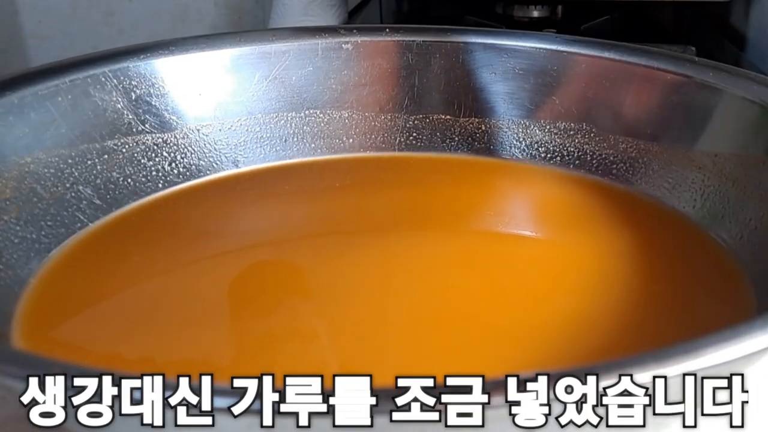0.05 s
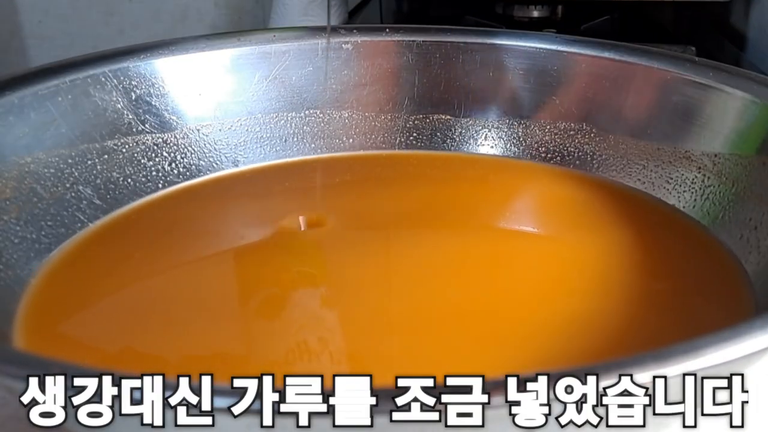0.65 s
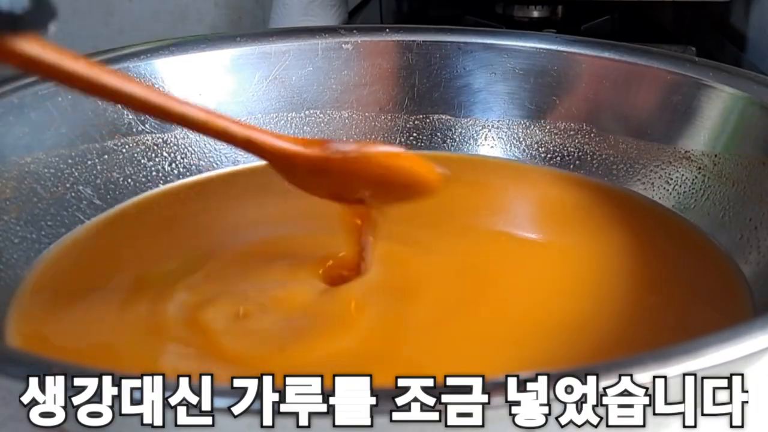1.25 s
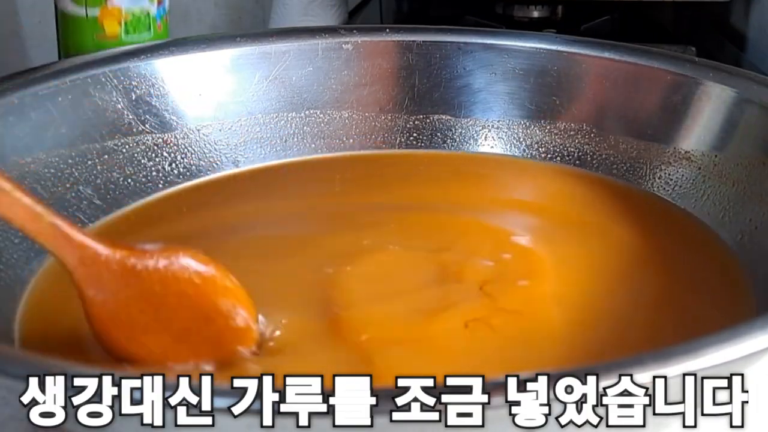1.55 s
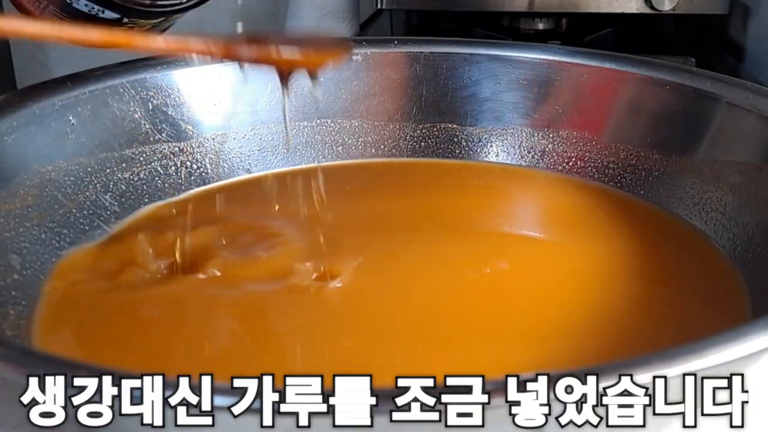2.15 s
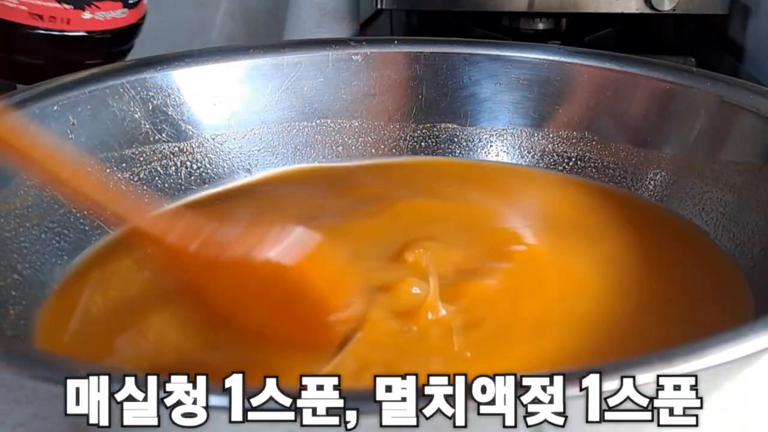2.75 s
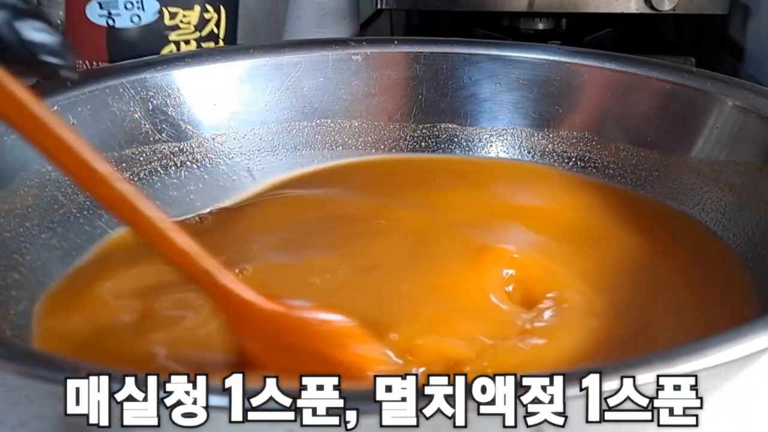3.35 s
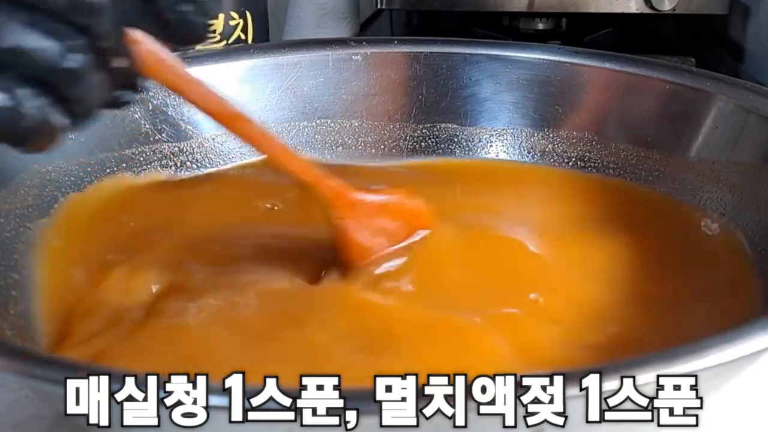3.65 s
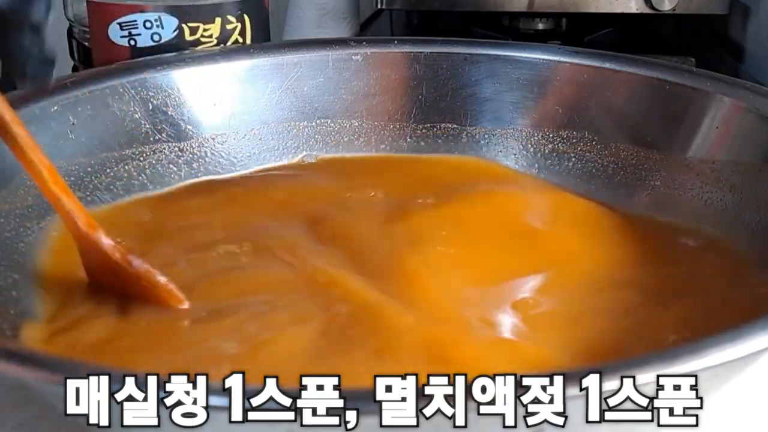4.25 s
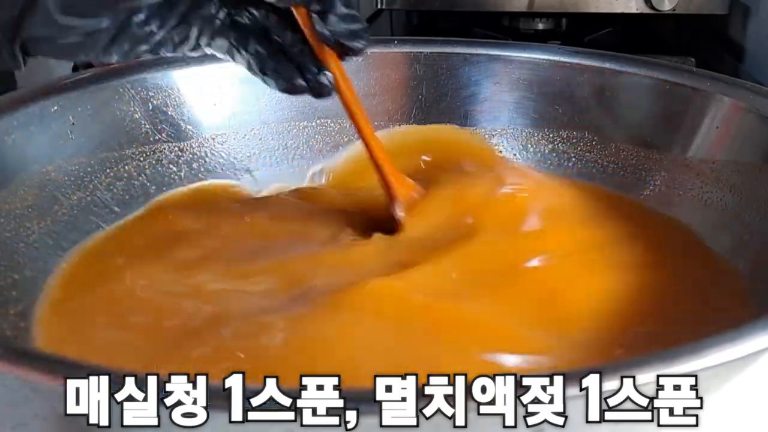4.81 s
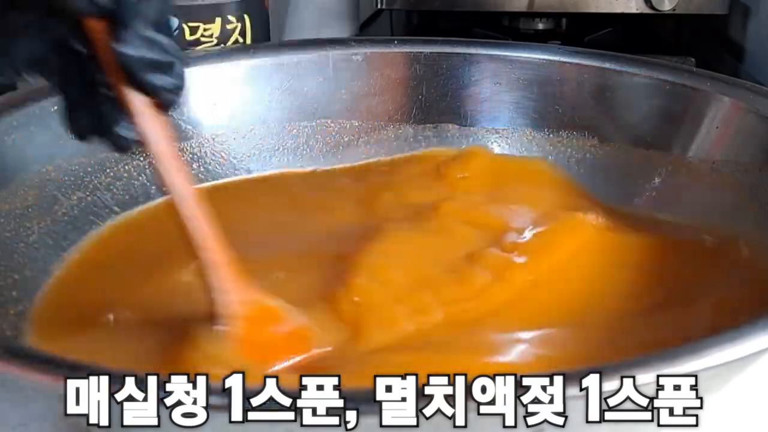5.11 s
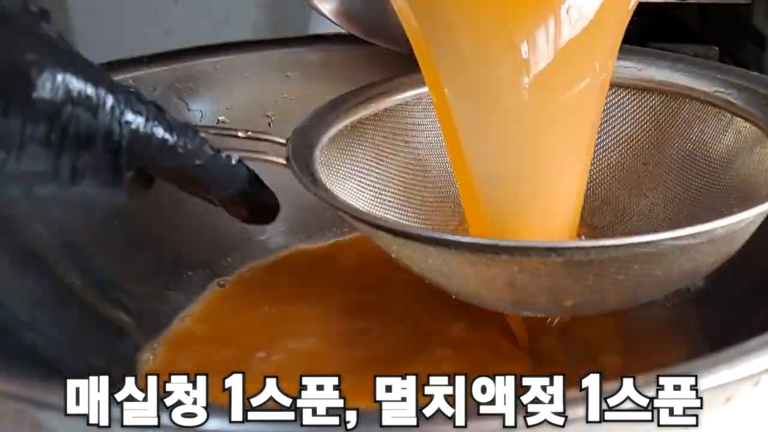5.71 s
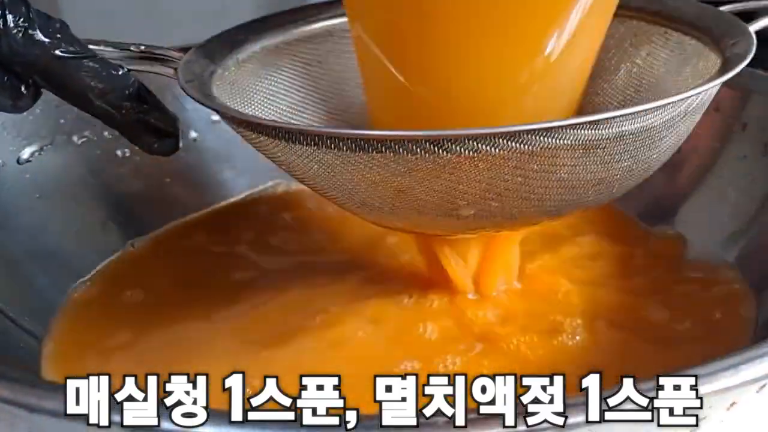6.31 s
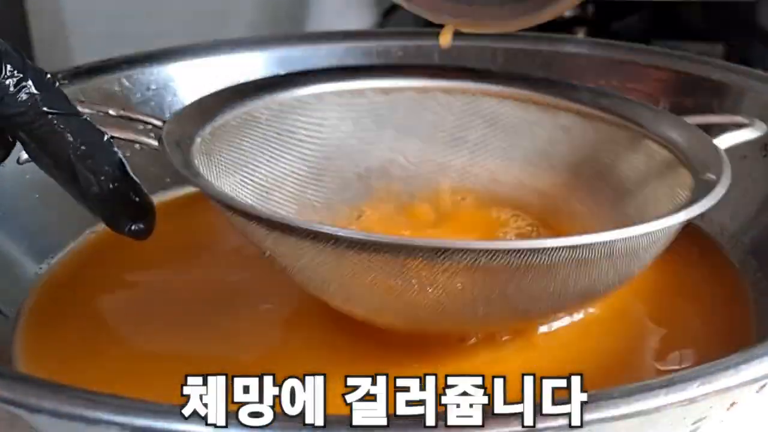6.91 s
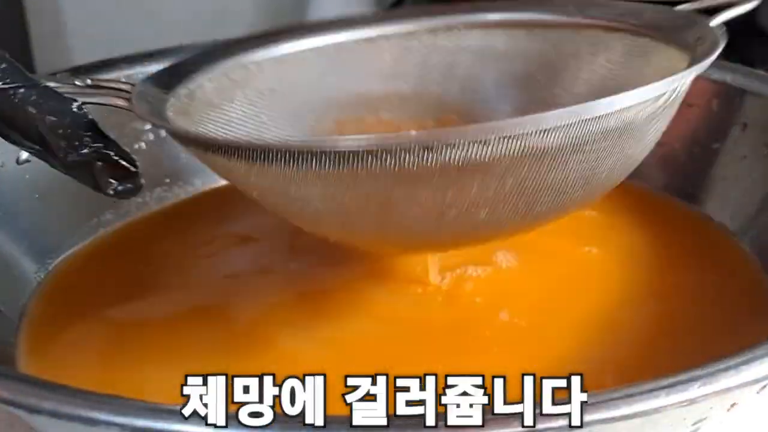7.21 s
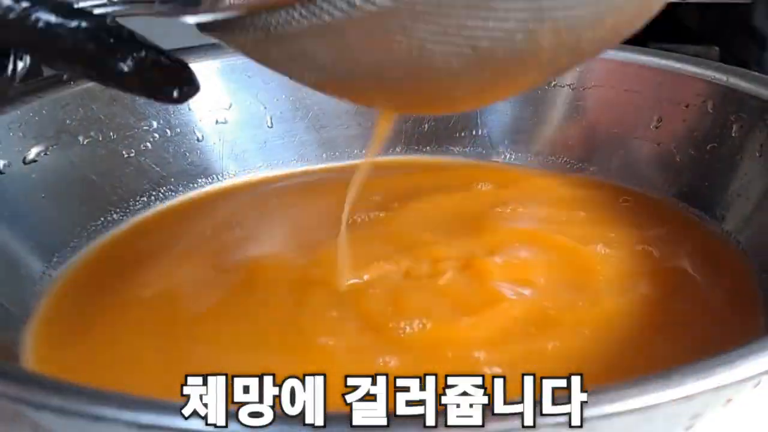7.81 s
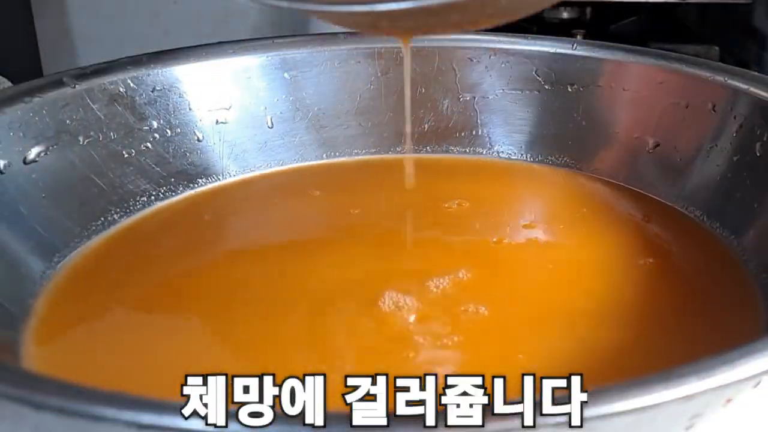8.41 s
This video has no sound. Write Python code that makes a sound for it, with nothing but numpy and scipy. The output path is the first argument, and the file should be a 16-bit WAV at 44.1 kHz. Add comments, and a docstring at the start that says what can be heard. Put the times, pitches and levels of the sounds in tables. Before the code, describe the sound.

Close, wet kitchen sounds over quiet room air. A few drops plink into sauce over a muffled engine hum that soon stops. Louder plops and splashes lead into gentle stirring, with deep gulps and several short, ringing knocks of a spoon on the steel bowl. After a brief dip, liquid hisses onto a strainer and splashes through into the bowl, ending in light trickles, scattered drips and a faint fizz of froth.

```python
"""Kitchen work over a wide steel bowl of thick sauce, in three shots joined by short fades.
First, seasonings drip from a spoon, each drop trapping a ringing bubble, while an engine drones outside.
Next, bigger splashes thump in the bowl; then the spoon stirs, the sauce gulps and the knocked steel rings.
Last, the sauce is poured through a mesh strainer: it hisses on the bare mesh, breaks through with a
gurgle and drains in a thinning dribble as the froth fizzes away."""
import sys
import numpy as np
from scipy import signal
from scipy.fft import rfft, irfft, next_fast_len
from scipy.io import wavfile
from scipy.ndimage import map_coordinates

SR = 44100
rng = np.random.default_rng(int(sys.argv[2]) if len(sys.argv) > 2 else 0)


def log_audio(samples):
    """Write samples as a 16-bit WAV file to the path given in sys.argv[1]."""
    # one column per channel
    frames = np.atleast_2d(samples).T
    # limit to full scale, then quantise
    limited = np.clip(frames, -1, 1)
    pcm = np.round(limited * 32767).astype(np.int16)
    wavfile.write(sys.argv[1], SR, pcm)


N = 373086
TIME = np.arange(N) / SR

# Cue sheets; levels are relative, ahead of the mix.
SHOT_CHANGES = [1.58, 5.29]  # where one shot gives way to the next: time_s
DRIPS = [(0.757, 3990, -45.5, 0.17), (0.838, 4370, -32.5, 0.048), (0.881, 6260, -26, 0.034),
         (0.913, 2520, -28.5, 0.19), (1.034, 2122, -27.5, 0.09), (1.039, 5040, -20, 0.016),
         (1.135, 1190, -11.5, .03), (1.142, 725, -25, 0.04), (2.06, 1712, -16, 0.063),
         (2.086, 990, -18.5, 0.17), (2.111, 987, -15, 0.1), (2.151, 4150, -13, .035),
         (2.208, 977.5, -16, 0.15), (2.224, 2107, -19, 0.15), (2.231, 3120, -21.5, 0.11),
         (2.297, 2034, -13, 0.045), (2.33, 5880, -14.5, 0.052), (2.364, 934, -21.5, 0.076),
         (2.468, 2050, -35, 0.06), (2.537, 1067, -7.5, 0.089), (2.993, 1950, -22.5, 0.13),
         (3.83, 3380, -30.5, .04), (5.377, 3220, -22, 0.042), (5.469, 3250, -14.5, 0.029),
         (5.529, 3060, -19, 0.033), (5.645, 5630, -26.5, 0.057), (5.718, 4670, -22, .02),
         (5.737, 1406, -9.5, 0.022), (5.942, 1005, -15, 0.053), (6.004, 1550, -14, 0.036),
         (6.048, 1860, -15, .04), (6.078, 865, -21, 0.035), (6.118, 598, -23.5, .07),
         (6.14, 1490, -14, 0.021), (6.457, 2080, -14, .04), (6.485, 1050, -11.5, 0.023),
         (6.57, 3610, -16.5, 0.043), (6.592, 5180, -16, 0.023), (6.775, 2380, -38.5, 0.027),
         (6.994, 8480, -34.5, 0.03), (7.16, 8000, -46.5, 0.057), (7.447, 1600, -26.5, 0.067),
         (7.489, 6400, -28, .012), (7.519, 1970, -33, 0.026), (7.547, 2750, -32, 0.034),
         (7.581, 1445, -29, 0.036), (7.635, 5640, -27, .04), (7.651, 2000, -26, 0.032),
         (7.712, 2467, -25, 0.054), (7.803, 5870, -27, 0.034), (7.951, 1484, -27, .06),
         (7.966, 1383, -25.5, 0.047), (8.012, 2040, -26.5, 0.037), (8.11, 1667, -25, 0.065),
         (8.19, 1450, -34, 0.069), (8.237, 1630, -23, 0.033), (8.255, 2050, -28.5, 0.041),
         (8.342, 1940, -30.5, 0.063), (8.397, 1558, -33, 0.055)]  # the clearest drops: start_s, pitch_hz, level_db, t60_s
# lumps of liquid landing: start_s, level_db, coarseness (0 mist to 1 large bubbles), length_s
SPLASHES = [(0.912, -27, .35, 0.026), (1.027, -29.5, 0.39, 0.011), (1.362, -31, 0.045, 0.013),
            (2.049, -27, 0.19, .022), (2.15, -19.5, .55, 0.039), (2.271, -29.5, 0.091, .014),
            (2.294, -17, .72, 0.022), (2.329, -16, .42, 0.017), (2.361, -12.5, 0.27, 0.022),
            (2.39, -18.5, .4, .022), (2.536, -11.5, .55, 0.019), (5.373, -25.5, 0.35, 0.024),
            (5.467, -13.5, .45, 0.015), (5.517, -23.5, .5, 0.023), (5.731, -8.5, .5, 0.023),
            (6.001, -16.5, .8, 0.029), (6.046, -22, .75, 0.02), (6.136, -19.5, .72, 0.046),
            (6.394, -18.5, .3, .022), (6.46, -17, 1, .03), (6.592, -23, .5, .022), (7.449, -37, .5, 0.019),
            (7.518, -33.5, 0.13, 0.013), (7.634, -29.5, .42, 0.017), (7.804, -37.5, 0.17, 0.019),
            (7.961, -25.5, .7, .02), (8.005, -34, .3, 0.012), (8.036, -35.5, 0, 0.018),
            (8.132, -28, .45, 0.018), (8.395, -31.5, .25, 0.022)]
POUR_FLOW = [(5.42, -47.5), (5.516, -45.5), (5.574, -46), (5.938, -39.5), (6.092, -32.5), (6.286, -39.5),
             (6.486, -35), (6.608, -48.5), (6.66, -53)]  # the pour into the strainer: time_s, flow_db
THIN_STREAMS = [(2.088, .16, -37.5), (2.46, .13, -44), (7.449, 0.034, -51.5), (7.532, 0.12, -50),
                (7.942, .14, -51.5), (8.107, .17, -51), (8.328, 0.074, -49)]  # trickles off spoon and strainer: start_s, length_s, flow_db
# spoon against bowl: start_s, crack_db, boom_db, clop_db, ring_db, click_db
SPOON_HITS = [(2.952, -11.5, -26.5, -28.5, -39.5, -53), (2.991, -15.5, -33.5, -36.5, -36, -45.5),
              (4.039, -6, -26, -14, -21.5, -27), (4.655, -11.5, -16, -27.5, -19.5, -26),
              (4.819, -9.5, -26, -30, -30, -32.5)]
BOWL_MODES = [(199.5, -1.5, 0.23), (487, -3, 0.12), (658.7, 0.5, 0.1), (754, -12, 0.14), (1565, -7.5, 0.42),
              (1830, -12.5, 0.35), (1977, 4, 0.23), (2180, -4, 0.38), (2275, -2, 0.24), (2554, -8.5, 0.34),
              (3000, -9, 0.13), (3075, -8.5, 0.31), (4050, -9, 0.15), (4580, -7, 0.16), (4610, -4, .17),
              (4900, 2, .2), (5190, -7.5, 0.32)]  # resonances of the filled bowl: pitch_hz, level_db, t60_s
# low gulps of the sauce, the first two from air pockets closing in a splash's crater: # start_s, pitch_hz,
# climb (share of the pitch), level_db, length_s
GULPS = [(2.369, 208, -0.02, -34.5, .06), (2.538, 215, -0.12, -28.5, 0.065),
         (3.398, 150.5, 0.52, -12.5, .036), (3.42, 125.8, 0.11, -17.5, 0.056),
         (3.465, 129, 0.14, -28, 0.13), (3.542, 153.2, 0.03, -12, .073),
         (3.595, 182, 0.34, -13, .043), (3.64, 165, -0.057, -19, .04),
         (7.008, 106, -0.025, -37, 0.044), (7.111, 103, -.05, -42.5, 0.028),
         (7.188, 106, 0.035, -50.5, .05), (8.115, 109, 0.0048, -28, 0.045)]
STIR_EFFORT = [(2.55, -56.5), (3.35, -52), (3.54, -39), (3.59, -36.5), (3.77, -47.5), (4.22, -46.5),
               (4.42, -57), (4.8, -55.5), (5.2, -66.5)]  # how hard the spoon stirs: time_s, level_db
SPOON_DRAGS = [(3.0, 0.027, -54.5), (3.541, 0.065, -47.5), (3.665, 0.14, -62), (4.085, 0.042, -55.5),
               (4.256, 0.14, -46.5), (4.418, 0.16, -51.5), (4.559, 0.088, -47.5), (4.83, 0.04, -49.5)]  # spoon along the surface or wall: start_s, length_s, level_db
WET_RUBS = [(2.879, 3200, -56, 0.074), (5.164, 2240, -47.5, 0.1), (6.896, 1590, -61, 0.1)]  # utensil rubbing steel: start_s, pitch_hz, level_db, length_s
ENGINE_LEVELS = [(0.0, -40.5, -49.5), (0.65, -49, -60.5), (1.146, -44, -54.5), (1.352, -45.5, -59.5),
                 (1.48, -51.5, -57.5)]  # the engine outside: time_s, drone_db, road_db
ROOM_DECAY = [(150, 0.38), (1000, 0.25), (3000, 0.24), (8000, 0.17), (15000, 0.033)]  # the kitchen's reverb: frequency_hz, t60_s

# Tone curves, all: frequency_hz, level_db
GURGLE_EQ = [(200, -11.5), (450, -12), (800, -9.5), (1500, 8), (2200, 6.5), (3200, -16), (6000, -52)]  # large bubbles
SPATTER_EQ = [(900, -39), (1800, -11), (2600, -10), (5000, -6.5), (7000, -19), (10000, -23.5)]  # small bubbles
MIST_EQ = [(3500, -31), (7000, -2.5), (10000, -7.5), (13000, -5), (16000, -14)]  # finest spray
DRONE_EQ = [(25, -27), (58, -6), (90, -5.5), (150, -0.5), (200, -4), (260, -4.5), (320, -4), (450, -9),
            (650, -17), (1200, -45.5)]  # engine through the wall
ROAD_EQ = [(200, -14), (500, -2.5), (750, -9.5), (980, 6), (1150, -1.5), (1500, -3), (2000, -11),
           (2600, -26), (6000, -36.5)]  # road noise
ROOM_TONE_EQ = [(15, -40.5), (25, -9), (137, -2.5), (317, -11), (659, -23), (962, -23), (1160, -23),
                (1330, -29.5), (1890, -29), (2280, -32.5), (5140, -35.5), (5880, -39.5), (12200, -35),
                (16000, -30)]  # kitchen air
TICK_EQ = [(200, -2.5), (700, -2), (1500, -12.5), (5000, -1), (9000, -4), (16000, -7.5)]
THUD_EQ = [(80, -9.5), (195, 5), (290, -9), (400, 0), (800, -15.5), (2000, -26)]
HEAVE_EQ = [(20, -35), (38, -19), (60, 3.5), (200, 0), (350, -11.5), (700, -38.5), (2000, -62)]
SLOSH_EQ = [(150, .5), (400, -3), (800, -7), (1300, -.5), (2000, -16.5), (3200, -25.5), (7000, -33.5),
            (15000, -29.5)]
SWIRL_EQ = [(25, -31.5), (55, -4.5), (72, 12), (100, -4.5), (150, -11), (300, -8), (600, -17.5),
            (1500, -52)]
EXHAUST_EQ = [(40, -45), (88 * .76, -10), (88, 0), (100, -9), (116, -1), (140, -16), (260, -26),
              (600, -60)]


def drops(tick_t60=.035, spray_db=-10, spray_t60=.12, satellite_db=-11):
    """Each drop ticks, sprays and traps a bubble; smaller satellites follow as the crater closes."""
    out, t = np.zeros(N), np.arange(SR // 5) / SR
    burst = (amp(-60 * t / tick_t60) + amp(spray_db - 60 * t / spray_t60)) * (1 - np.exp(-t / .00037))
    for start, hz, db, t60 in DRIPS:
        tick = colour(rng.standard_normal(len(t)) * burst, TICK_EQ)
        add(out, start, amp(db) * bubble(t, hz, t60) + amp(-23.5 + .8 * db) * tick)
        for lateness, smallness in rng.random((3, 2)):
            ratio = 1 + .7 * smallness ** 2
            satellite = bubble(t, hz * ratio, t60=.034) / ratio
            add(out, start + .0066 + .03 * lateness, amp(db + satellite_db - 9.7 * lateness) * satellite)
    return out


def bubble(t, hz, t60, rise=.052):
    """One bubble rings, rising in pitch and fluttering as it surfaces."""
    glide = rise * np.tanh(2 * t / t60 - .5) * .036 / t60  # shallow bubbles die sooner and rise faster
    flutter = map_coordinates(rng.standard_normal(200), [t * hz / 10], mode="nearest")
    phase = 2 * np.pi * np.cumsum(hz * (1 + glide)) / SR + flutter
    return np.sin(phase) * amp(-60 * t / t60) * (1 - np.exp(-t * hz / 2))


def splashes(attack_s=.0025, click_t60=.005, settle_s=.06):
    """A lump of liquid clicks and thuds into the pool and bursts into bubbles and mist."""
    out, t = np.zeros(N), np.arange(SR // 5) / SR
    for start, db, coarseness, length in SPLASHES:
        # bubble sizes closest to the splash's coarseness speak loudest
        big_db, small_db, mist_db = -25.5 * np.abs(coarseness - np.array([1, .5, 0]))
        decay = np.exp(-2 * t / length)
        settling = amp(-14) * np.exp(-t / settle_s)  # the finest spray falls back
        big = swarm(220, len(t), low_hz=850, high_hz=2600, cycles=24, spread_db=2, rise=.06)
        small = swarm(480, len(t), low_hz=2300, high_hz=7200, cycles=34, spread_db=2.2, rise=.04)
        spray = colour(rng.standard_normal(len(t)), MIST_EQ) * (decay + settling)
        thud = colour(rng.standard_normal(len(t)), THUD_EQ)
        click = rng.standard_normal(len(t)) * amp(mist_db - 5 - 60 * t / click_t60)
        cloud = amp(big_db - 1) * big + amp(small_db - 2) * small + amp(-18) * thud
        body = (1 - np.exp(-t / attack_s)) * (decay * cloud + amp(mist_db) * spray)
        add(out, start, amp(db) * (click + body))
    return out


def stream(breakthrough_s=5.86, opening_s=.039, lumps_db=2.1, surge_db=1.6):
    """Falling sauce traps swarms of bubbles; a thin trickle traps fewer large ones."""
    def lumpy(bubbles, wash_eq, wash):
        """Bubbles over a noise wash, pulsing as the stream breaks into lumps."""
        return amp(lumps_db * wobble(60)) * (bubbles + wash * noise(wash_eq)) / np.hypot(1, wash)

    pouring = (TIME > SHOT_CHANGES[1]) * (TIME < POUR_FLOW[-1][0])
    pour = amp(np.interp(TIME, *np.transpose(POUR_FLOW))) * pouring
    trickle = sum(amp(db) * held(start, length, attack_s=.0074, release_s=.017)
                  for start, length, db in THIN_STREAMS)
    # until the jet breaks through, bare mesh damps the gurgle and lifts the hiss
    bare_mesh = np.clip(1 - (TIME - breakthrough_s) / opening_s, 0, 1)
    big = swarm(2000, N, low_hz=450, high_hz=2700, cycles=38, spread_db=2.8, rise=.05)
    small = swarm(4000, N, low_hz=2000, high_hz=7000, cycles=70, spread_db=3.6, rise=.03)
    fine = swarm(9000, N, low_hz=6100, high_hz=15600, cycles=44, spread_db=8.5, rise=.02)
    big = unit(colour(big, GURGLE_EQ))
    gurgle = (amp(-9.5 * bare_mesh) * pour + amp(-5) * trickle) * lumpy(big, GURGLE_EQ, wash=.5)
    spatter = (amp(-1) * pour + trickle) * lumpy(small, SPATTER_EQ, wash=.57)
    hiss = (amp(-6 + 3.5 * bare_mesh) * pour + amp(-4) * trickle) * lumpy(fine, MIST_EQ, wash=.92)
    return (gurgle + spatter + hiss) * amp(surge_db * wobble(35))


def swarm(count, samples, low_hz, high_hz, cycles, spread_db, rise):
    """Scattered tiny bubbles at rms 1, each ringing briefly and rising in pitch."""
    when, smallness, strength = rng.random((count, 3)).T[:, :, None]
    hz = low_hz * (high_hz / low_hz) ** smallness
    n = np.arange(min(int(cycles * SR / low_hz), 2000))
    turns = hz * n / SR
    age = turns / cycles
    glide = 1 + rise * np.minimum(age, 1)
    ring = np.sin(2 * np.pi * turns * glide) * amp(-60 * age) * (1 - np.exp(-turns))
    gain = amp(-spread_db * np.log(np.maximum(strength, .02)))
    positions = (when * samples).astype(int) + n
    return unit(np.bincount(positions.ravel(), (ring * gain).ravel(), samples)[:samples])


def knocks(crack_t60=.058, rattle_t60=.33, attack_s=.00084):
    """The spoon strikes the bowl; the contact point picks the modes and moving sauce blurs them."""
    out, t = np.zeros(N), np.arange(SR // 2) / SR
    hz, mode_db, t60 = np.transpose(BOWL_MODES)[:, :, None]
    burst = amp(-60 * t / crack_t60) + amp(-7 - 60 * t / rattle_t60)  # the blow, then many weak modes
    for start, crack_db, boom, clop, ring, click in SPOON_HITS:
        contact_eq = [(200, boom), (500, clop), (800, clop), (1500, ring - 2), (2500, ring - 2),
                      (3500, click - 1), (5200, click - 1)]
        crack_eq = [(100, boom - 14), (200, boom - 1), (330, (boom + clop) / 2 - 7), (600, clop),
                    (850, clop - 1), (1150, (clop + ring) / 2 - 8), (2000, ring - 2), (3500, click - 5),
                    (5200, click - 6), (6500, click - 20), (15000, click - 32)]
        level_db = mode_db + along(contact_eq, hz) - 2 + 1.1 * rng.standard_normal(hz.shape)
        blur = np.cumsum(rng.standard_normal((len(hz), len(t))), axis=1) * np.sqrt(hz / SR) * .25
        polarity = rng.choice([-1, 1], hz.shape)
        modes = polarity * amp(level_db - 60 * t / t60) * np.sin(2 * np.pi * hz * t + blur)
        crack = amp(crack_db - 12.5) * colour(rng.standard_normal(len(t)) * burst, crack_eq)
        add(out, start + .00078, (modes.sum(0) + crack) * (1 - np.exp(-t / attack_s)))
    return out


def gulps():
    """The sauce gulps and air pockets close under splashes: low gliding notes with a wet slosh."""
    notes, swell = np.zeros(N), np.zeros(N)
    for start, hz, climb, db, length in GULPS:
        progress = np.linspace(0, 1, int(length * SR))
        envelope = amp(db) * np.abs(np.sin(np.pi * progress)) ** .64
        pitch_hz = hz * (1 + climb * (progress - .5))
        add(notes, start, envelope * np.sin(2 * np.pi * np.cumsum(pitch_hz) / SR))
        add(swell, start, envelope)
    slosh = amp(-9.5) * noise(HEAVE_EQ) + amp(-23) * noise(SLOSH_EQ)
    froth = swarm(1500, N, low_hz=2000, high_hz=9000, cycles=50, spread_db=3, rise=.04)
    return notes + swell * (slosh + amp(-39) * froth)


def swirl():
    """The stirred pool rumbles with the spoon's effort."""
    return amp(3.5) * fader(STIR_EFFORT) * noise(SWIRL_EQ)


def swishes(surge_db=2):
    """Stirred sauce swishes softly with the effort, and hisses where the spoon drags."""
    stirring = amp(-45.5) * fader(STIR_EFFORT) ** .29
    drag = sum(amp(db) * held(start, length, attack_s=.027, release_s=.023)
               for start, length, db in SPOON_DRAGS)
    gurgle = (amp(-2) * stirring + amp(-7) * drag) * noise(GURGLE_EQ)
    spatter = (amp(-4) * stirring + amp(-1) * drag) * noise(SPATTER_EQ)
    hiss = (stirring + drag) * noise(MIST_EQ)
    return (gurgle + spatter + hiss) * amp(surge_db * wobble(22))


def squeaks(width=.11):
    """A wet utensil rubs on the steel with a faint, narrow rasp."""
    out = np.zeros(N)
    for start, hz, db, length in WET_RUBS:
        progress = np.linspace(0, 1, int(length * SR))
        band = [(hz / 2, -50), (hz * (1 - 2 * width), -20), (hz * (1 - width / 2), 0),
                (hz * (1 + width / 2), 0), (hz * (1 + 2 * width), -20), (hz * 2, -50)]
        rasp = unit(colour(rng.standard_normal(len(progress)), band))
        add(out, start, amp(db) * np.sin(np.pi * np.sqrt(progress)) * rasp)
    return out


def foam(start_s=6.55, attack_s=.084, fade_db_per_s=13.5, flicker_db=3):
    """Froth in the mesh fizzes away after the pour."""
    age = np.maximum(TIME - start_s, 0)
    level_db = -52.5 - fade_db_per_s * age + flicker_db * wobble(18)
    return np.minimum(age / attack_s, 1) * amp(level_db) * noise(MIST_EQ)


def engine(firing_hz=29.1, roughness=.66):
    """Firing pulses and road noise come through the wall; the exhaust booms as the engine pulls."""
    times, *levels = np.transpose(ENGINE_LEVELS)
    first_shot = TIME < SHOT_CHANGES[0]
    drone_gain, road_gain = [amp(np.interp(TIME, times, db)) * first_shot for db in levels]
    firings = np.cumsum(firing_hz * (1 + .0076 * wobble(5.06))) / SR
    orders = np.arange(2, 18)[:, None]
    phases = 2 * np.pi * (orders * firings + rng.random(orders.shape))
    harmonics = amp(along(DRONE_EQ, orders * firing_hz)) * np.sin(phases)
    boom = amp(-36) * held(start_s=.567, length_s=.66, attack_s=.12, release_s=.033) * noise(EXHAUST_EQ)
    drone = unit(unit(harmonics.sum(0)) + roughness * noise(DRONE_EQ))
    return amp(1.5) * drone_gain * drone + amp(3) * road_gain * noise(ROAD_EQ) + boom


def room_tone(whine_hz=15734):
    """A wide bed of kitchen air and a faint high whine, with levels set shot by shot."""
    shot = np.searchsorted(SHOT_CHANGES, TIME)
    air = noise(ROOM_TONE_EQ) + np.array([noise(ROOM_TONE_EQ), noise(ROOM_TONE_EQ)])
    whine = np.sin(2 * np.pi * whine_hz * TIME) * amp(2.5 * wobble(14) - 2)
    return amp([-52, -52, -57])[shot] * air + amp([-53, -72, -63])[shot] * whine


def reverb(x, wall_db, room_db, wall_t60=.031):
    """Close echoes off the steel walls arrive from the sides; the kitchen's tail differs in each ear."""
    hz, t, spectrum = signal.stft(rng.standard_normal((2, SR // 2)), SR, nperseg=256)
    tail = signal.istft(spectrum * amp(-60 * t / along(ROOM_DECAY, hz)[:, None]), SR, nperseg=256)[1]
    age = np.arange(tail.shape[1]) / SR
    walls = rng.standard_normal(len(age)) * amp(-60 * age / wall_t60)
    early = amp(wall_db) * np.array([walls, -walls]) / np.linalg.norm(walls)
    late = amp(room_db) * tail / np.linalg.norm(tail[0])
    response = np.pad(early + late, ((0, 0), (20, 0)))  # 20 samples of pre-delay
    return np.pad(x, (0, response.shape[1] - 1)) + signal.fftconvolve(x[None], response, axes=1)


def shifting_reverb(x, wall_db, room_db, hop=4096):
    """The liquid never lands on the same spot twice, so the echoes change from moment to moment."""
    out = np.zeros((2, N + 2 * SR))
    padded, window = np.pad(x, (hop, 2 * hop)), signal.get_window("hann", 2 * hop)
    for start in range(0, N + hop, hop):
        grain = reverb(padded[start:start + 2 * hop] * window, wall_db, room_db)
        out[:, start:start + grain.shape[1]] += grain
    return out[:, hop:hop + N]


def amp(db):
    """Decibels to gain."""
    return 10 ** (np.asarray(db) / 20)


def unit(x):
    """Scale to rms 1."""
    return x / np.sqrt(np.mean(x ** 2) + 1e-20)


def along(curve, hz):
    """Read a curve on a log frequency axis."""
    frequencies, values = np.transpose(curve)
    return np.interp(np.log(hz + 1), np.log(frequencies + 1), values)


def fader(points):
    """A gain ride through time_s, level_db points, silent outside them."""
    times, db = np.transpose(points)
    return amp(np.interp(TIME, times, db)) * (TIME >= times[0]) * (TIME <= times[-1])


def held(start_s, length_s, attack_s, release_s):
    """An envelope that rises, holds and dies away."""
    age = TIME - start_s
    return np.clip(age / attack_s, 0, 1) * np.exp(-np.maximum(age - length_s, 0) / release_s)


def wobble(rate):
    """A smooth random curve, rate knots a second."""
    return map_coordinates(rng.standard_normal(int(N * rate / SR) + 4), [TIME * rate])


def colour(x, eq):
    """Minimum-phase EQ that keeps the power of white noise."""
    size = 2 * next_fast_len(x.shape[-1] // 2 + 2048)
    gain = unit(amp(along(eq, np.fft.rfftfreq(size, 1 / SR))))
    cepstrum = irfft(np.log(gain))
    cepstrum[1:size // 2] *= 2
    cepstrum[size // 2 + 1:] = 0
    return irfft(rfft(x, size) * np.exp(rfft(cepstrum)))[..., :x.shape[-1]]


def noise(eq):
    """Coloured noise of rms 1."""
    return unit(colour(rng.standard_normal(N), eq))


def add(track, start_s, sound):
    """Mix a sound in at its cue."""
    start = max(round(start_s * SR), 0)
    track[start:start + len(sound)] += sound[:N - start]


def scene():
    """The mix: bowl to the right of the microphone, over the engine and room tone."""
    liquid = drops() + splashes() + stream() + foam() + swishes()
    low_cut = signal.butter(2, 130, "high", fs=SR, output="sos")  # small bubbles radiate no bass
    bowl = signal.sosfilt(low_cut, liquid) + knocks() + squeaks()
    close = shifting_reverb(bowl, wall_db=-2.5, room_db=-5.5) * amp([[-3.8], [.8]])
    bass = gulps() + swirl()
    low_end = shifting_reverb(bass, wall_db=-19.5, room_db=-13) * amp([[-3.3], [2.2]])
    outside = reverb(engine(), wall_db=-7, room_db=-11.5)[:, :N] * amp([[-4.5], [3]])
    return close + low_end + outside + room_tone() * amp([[-2], [1.5]])


def record(dry, fade_s=.07, top_hz=16050):
    """Fade out and in at each change of shot, and cut the highest treble."""
    fades = np.prod([np.minimum(np.abs(TIME - cut) / fade_s, 1) ** 2 for cut in SHOT_CHANGES], axis=0)
    size = next_fast_len(N + 4096)
    passband = np.fft.rfftfreq(size, 1 / SR) < top_hz
    return irfft(rfft(dry * fades, size) * passband, size)[:, :N]


dry = scene()
out = record(dry)
log_audio(out)
```